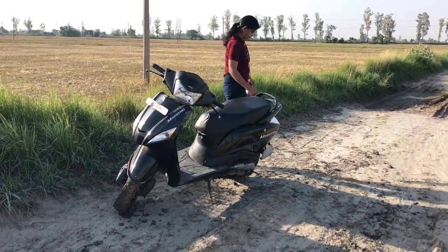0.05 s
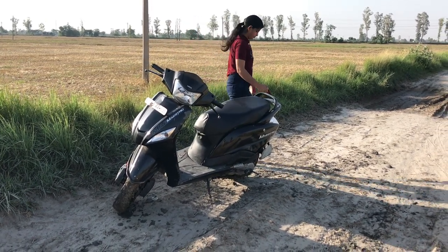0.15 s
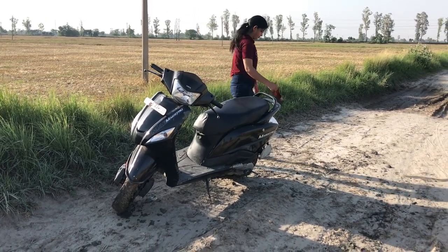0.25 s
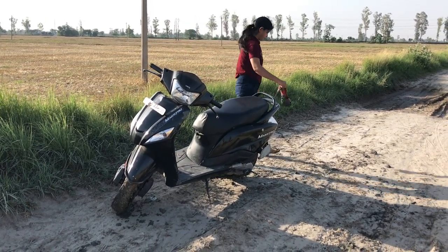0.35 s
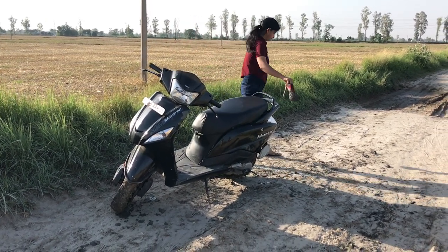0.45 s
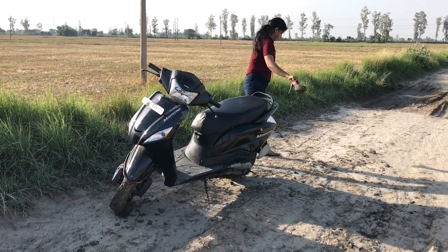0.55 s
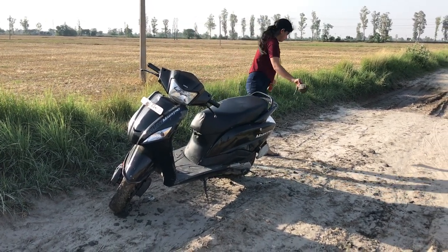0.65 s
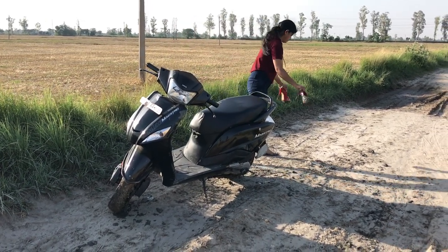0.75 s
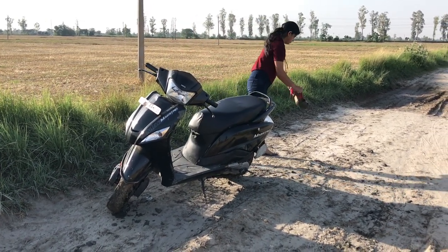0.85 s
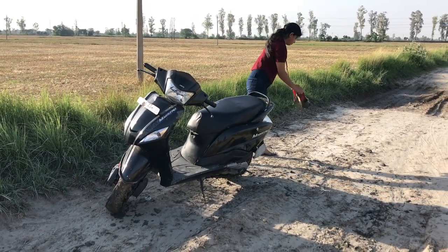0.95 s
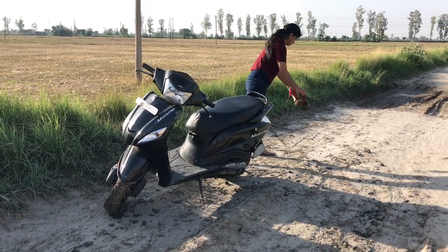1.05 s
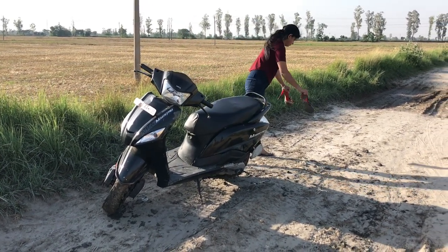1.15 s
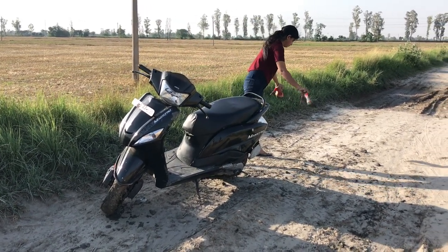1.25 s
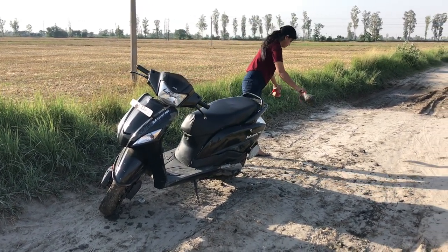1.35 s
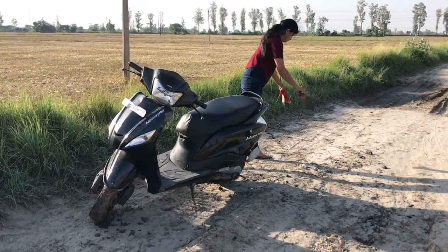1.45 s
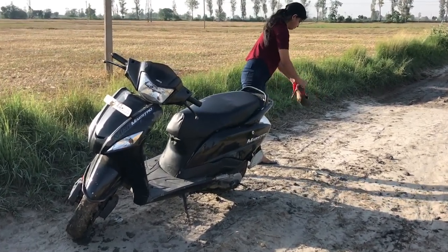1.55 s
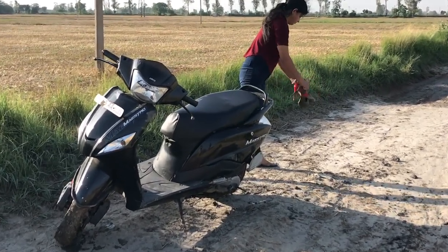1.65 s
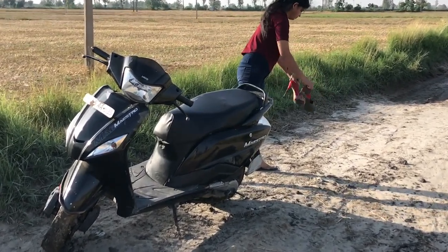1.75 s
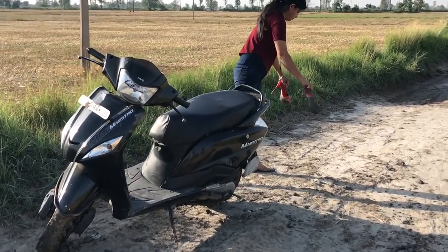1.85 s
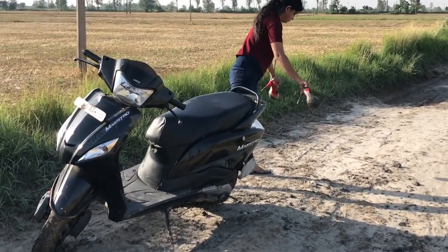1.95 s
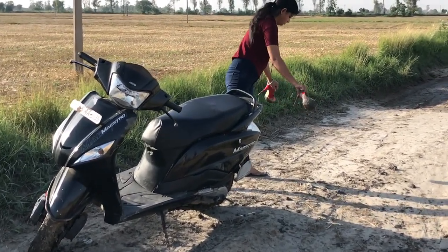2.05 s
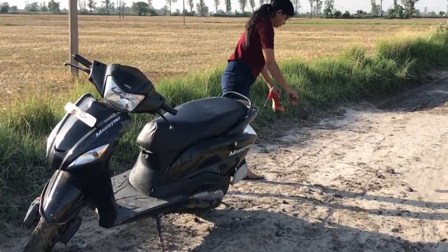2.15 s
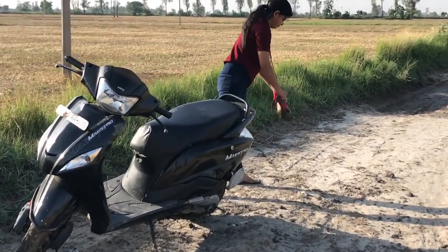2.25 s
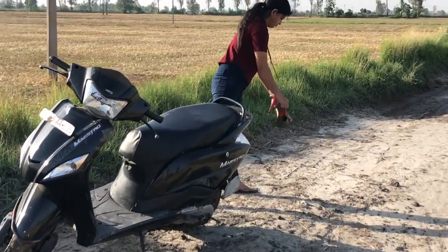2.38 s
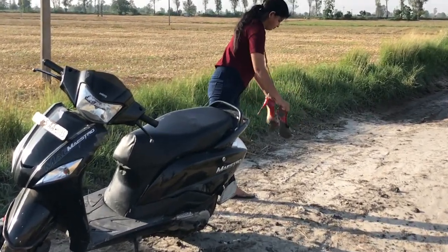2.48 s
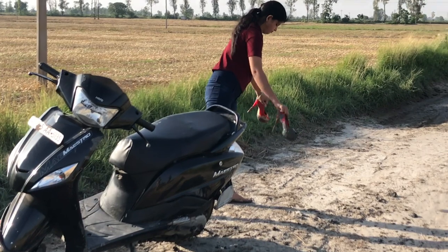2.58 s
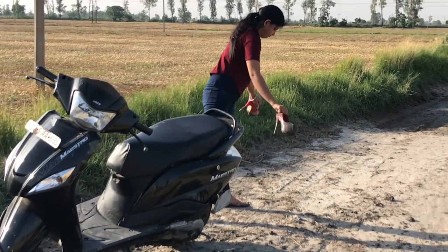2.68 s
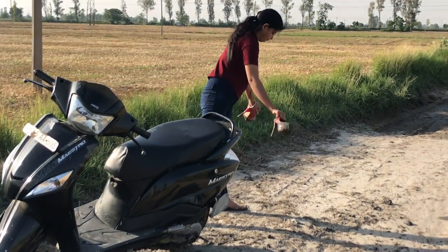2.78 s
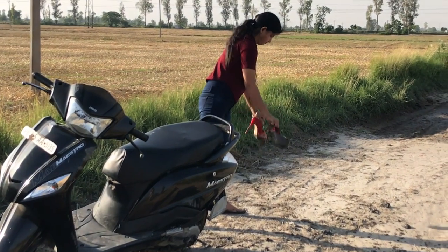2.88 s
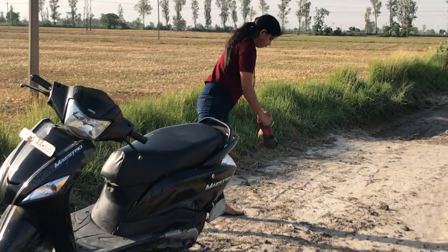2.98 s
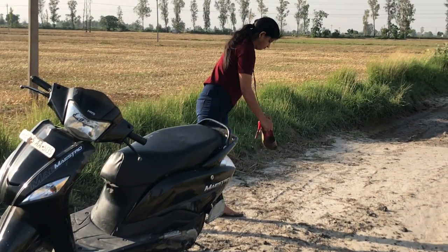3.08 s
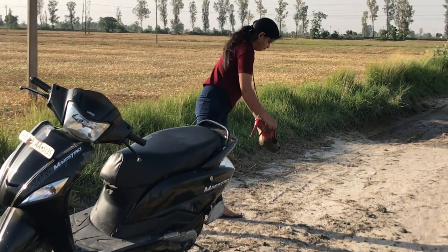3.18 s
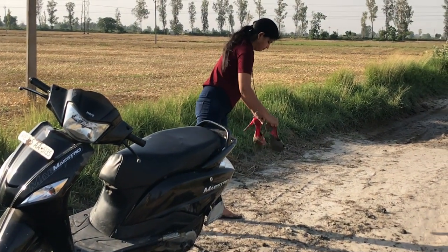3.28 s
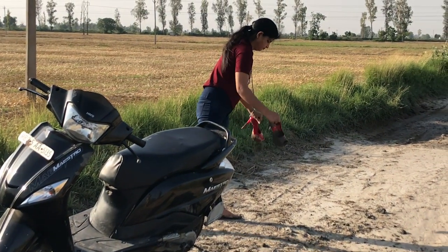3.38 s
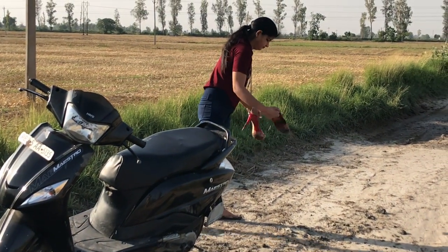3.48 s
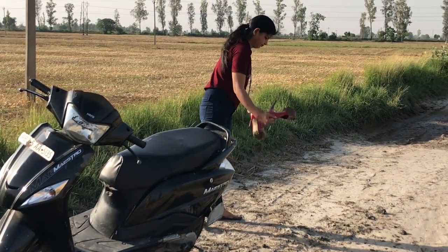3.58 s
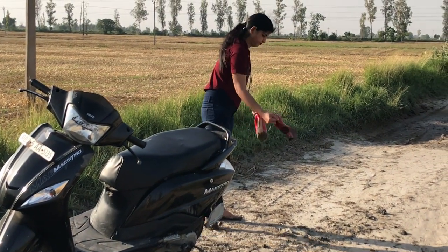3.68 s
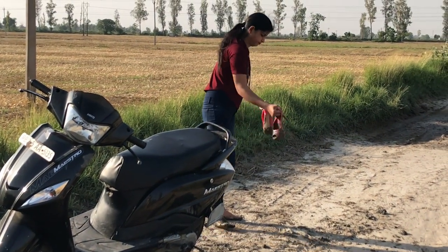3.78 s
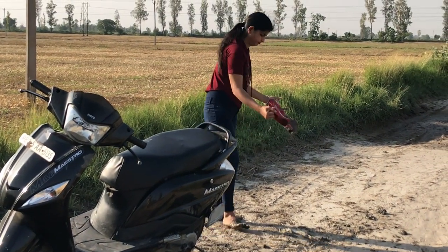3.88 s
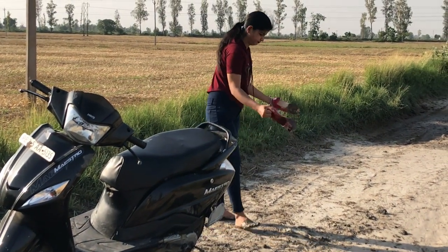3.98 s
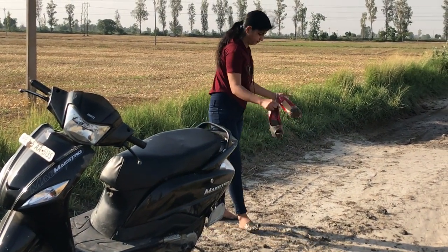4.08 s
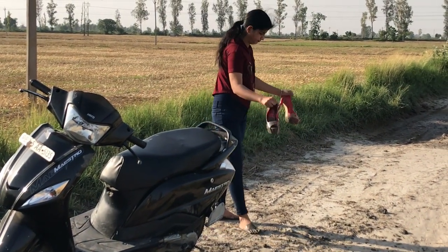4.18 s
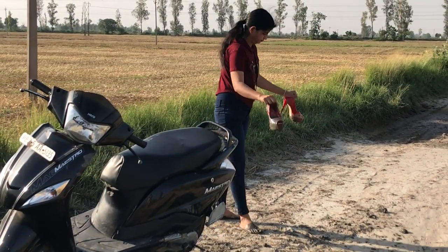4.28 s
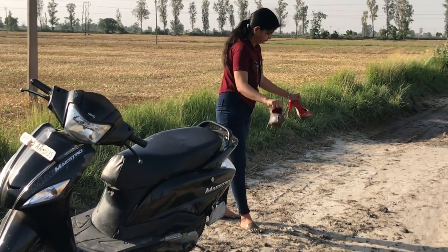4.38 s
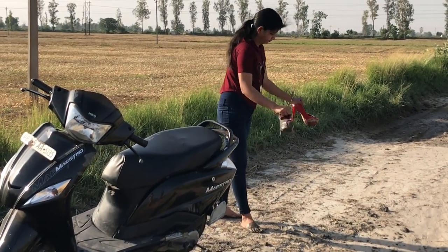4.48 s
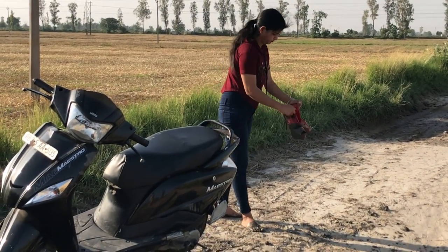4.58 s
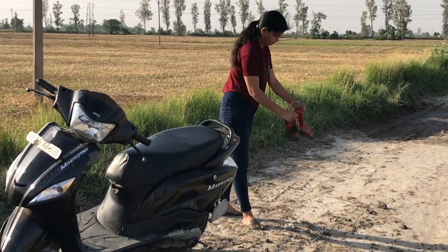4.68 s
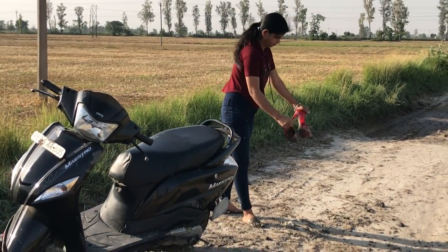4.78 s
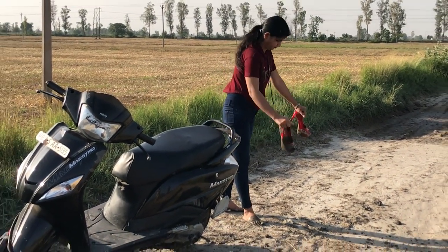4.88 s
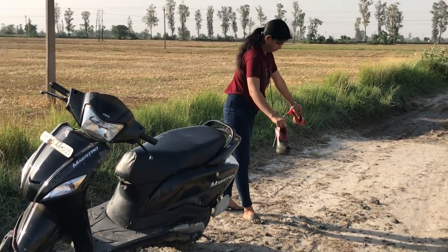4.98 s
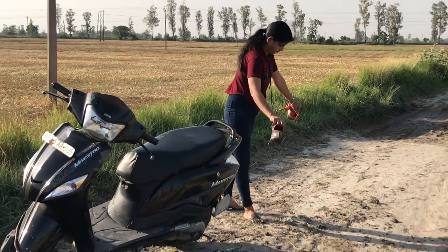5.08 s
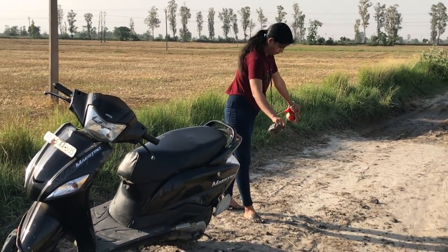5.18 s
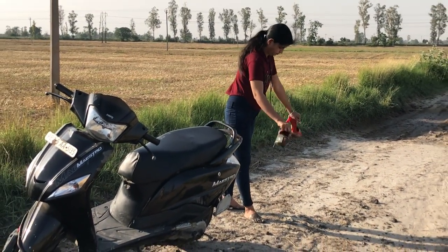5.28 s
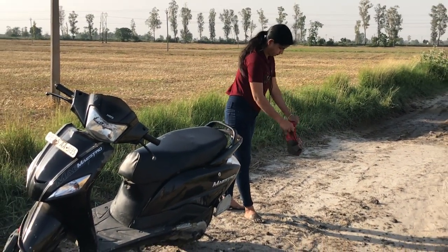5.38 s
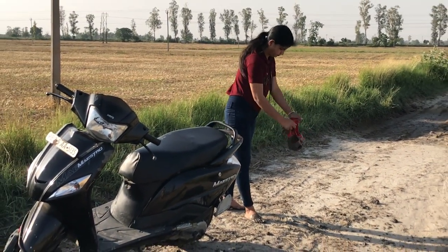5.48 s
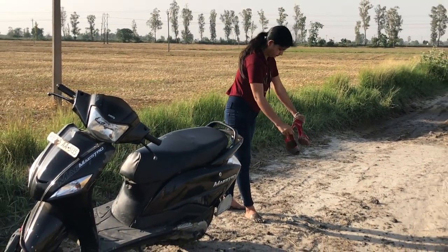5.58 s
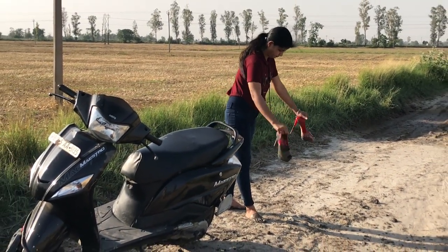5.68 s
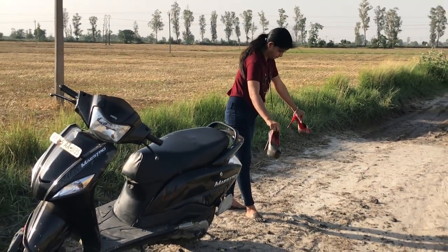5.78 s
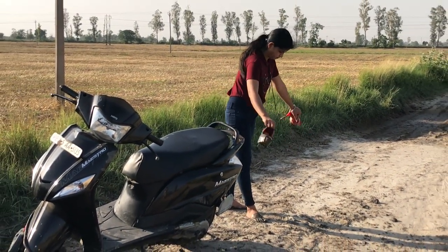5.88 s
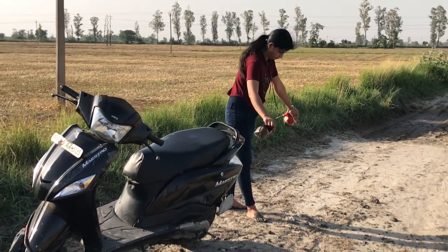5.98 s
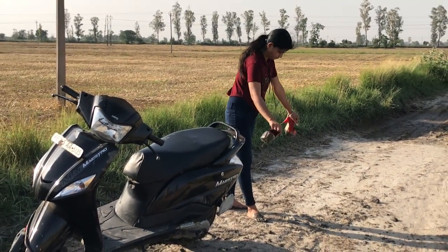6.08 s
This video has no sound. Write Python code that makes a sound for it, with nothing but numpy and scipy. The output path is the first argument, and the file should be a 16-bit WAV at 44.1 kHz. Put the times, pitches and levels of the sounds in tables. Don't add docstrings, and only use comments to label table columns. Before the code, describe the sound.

Six sharp, hollow claps of mud-caked sandals on a dirt track, shedding gritty crumbs, with low wind thumps, faint crickets and distant road hum.

```python
import sys
import numpy as np
from scipy import signal
from scipy.fft import rfft, irfft, next_fast_len
from scipy.io import wavfile

SR = 44100
rng = np.random.default_rng(int(sys.argv[2]) if len(sys.argv) > 2 else 0)


def linear_from_db(decibels):
    return 10 ** (np.asarray(decibels, float) / 20)


def persist_wave(psi):
    counts = np.round(np.clip(psi, -1, 1) * 32767).astype(np.int16)
    wavfile.write(sys.argv[1], SR, np.atleast_2d(counts).T)


N = 270798

# frequency in Hz, density in dB per Hz.
ROAD_SPECTRUM = [(250, -24), (330, -1), (480, -0.5), (640, 3.5), (780, -1), (1000, 2), (1400, -2.5),
                 (2000, -10), (3000, -17), (5000, -22)]
# time in seconds, level in dB.
ROAD_LEVEL = [(0, -52), (.31, -49.5), (2.44, -48.5), (4.46, -48), (5.04, -46.5), (5.61, -49.5), (6.14, -49)]
# time in seconds, level in dB.
WIND_LEVEL = [(0, -35), (.5, -37.5), (1.0, -36.5), (1.7, -39), (2.5, -37), (3.2, -37.5), (3.9, -36.5),
              (4.7, -39.5), (5.5, -37.5), (6.14, -39.5)]
# frequency in Hz, density in dB per Hz.
GUST_SPECTRUM = [(18, -31), (35, -2), (55, 19), (80, 8), (110, 11.5), (135, -9), (160, -48.5)]
# frequency in Hz, density in dB per Hz.
FLUTTER_SPECTRUM = [(100, -8), (140, 2), (180, -2.5), (230, -4), (290, -12.5), (400, -23.5), (600, -43)]
# centre in seconds, level in dB.
WIND_LUMPS = [(.02, -31), (.15, -34.5), (.26, -35), (.39, -30.5), (.48, -30), (.65, -49), (.95, -20),
              (1.02, -33), (1.2, -34), (1.49, -32), (1.57, -28.5), (2.5, -37), (2.72, -48), (2.82, -32),
              (3.01, -37), (3.13, -34.5), (3.86, -41), (4.07, -35), (4.238, -27.5), (4.56, -34),
              (4.62, -36), (4.7, -33), (4.96, -43), (5.37, -43), (5.59, -34.5), (6.02, -32)]
# start in seconds, peak in dB, first pitch in Hz, last pitch in Hz, turns in cycles.
BUFFETS = [(0.031, -25, 298, 150, 1.6), (0.084, -21, 222, 120, 1.44), (0.128, -19, 88, 59.4, 1.45),
           (0.323, -19, 129, 66.3, 1.7), (0.38, -27, 148, 90, 1.7), (0.432, -19, 185, 81, 1.5),
           (0.487, -24, 89.5, 60, 2), (0.634, -19, 83.6, 59, 1.3), (0.809, -24, 141, 90, 1.2),
           (0.8907, -7.5, 198, 181, 3.5), (0.8923, -18.5, 456, 294, 2.3), (0.899, -12.5, 86, 68, 2.34),
           (0.996, -16, 109, 63, 2.5), (1.166, -27.5, 255, 180, 1.1), (1.456, -24.5, 234, 111, 2),
           (1.556, -21, 129, 70, 1.5), (3.824, -24, 318, 147, 2.4), (4.225, -22, 119, 64.5, 1.2),
           (4.54, -28, 157, 109, 2.2)]
# start in seconds, end in seconds, level in dB,
# pitch at stroke start in Hz, lead on the common beat in strokes.
NEAR_TRILLS = [
    (-1, .2, -55, 8400, -.47),
    (1.2, 1.92, -59.5, 8400, -.5),
    (2.76, 3.985, -55.5, 8380, .79),
    (5.1, 6.3, -55.5, 8400, 2.3),
]
# start in seconds, end in seconds, level in dB,
# pitch at stroke start in Hz, lead on the common beat in strokes.
FAR_TRILLS = [
    (.02, .98, -59, 8550, -1.3),
    (1.9, 3.5, -61.5, 8750, 1.1),
    (4.5, 5.6, -64, 8650, .75),
]
# start in seconds, length in seconds, level in dB.
DUST_FALLS = [
    (1.657, 0.16, -57),
    (3.25, 0.044, -58),
    (4.697, 0.051, -48.5),
    (4.823, 0.095, -47.5),
    (5.14, .05, -67),
    (5.536, .14, -55),
    (5.71, 0.16, -59),
]
# time in seconds, peak in dB, dull part in dB against the bright part.
SHED_CRUMBS = [(.925, -35, -1), (.9667, -41, -20), (0.976, -25, -3.5), (1.646, -30, -9), (1.65, -32, -21),
               (1.6544, -37, -12), (1.6724, -34.5, -29), (2.3542, -25, -11), (2.364, -33.5, -9),
               (3.0885, -30, -5), (3.0954, -35, -29), (3.1115, -33, -25), (3.1393, -37.5, -36),
               (4.7044, -30.5, -13), (4.728, -38, -6), (5.5246, -37, -27), (5.528, -29, -7),
               (5.5472, -33, -3), (5.5967, -44, -26), (5.617, -40, -21), (5.6535, -44, -12)]
# time in seconds, peak in dB, dull part in dB against the bright part.
STRAY_CRUMBS = [(1.2231, -54, -3), (1.2487, -41.5, -23), (1.307, -35.5, -32), (1.3714, -46, 3),
                (2.209, -45, -12), (2.5726, -44, -18), (3.267, -37, -12), (3.3308, -52, -13),
                (3.658, -48.5, 6.5), (3.7338, -37, -7), (3.797, -42, -29), (4.12, -34.5, -29),
                (4.819, -29.5, -43), (4.905, -41, -21), (4.9214, -42, -17), (4.975, -44, -30),
                (5.1495, -41, -17), (5.2475, -41, -8), (5.7214, -41, -23), (5.7554, -44, -21)]
# time in seconds, pop of trapped air in dB, settled pitch in Hz, contact in ms,
# crack of the mud cake in dB.
CLAPS = [
    (0.9295, -0.5, 1067, 2.28, -6.5),
    (1.6088, -5.5, 950, 4.07, 1),
    (2.3133, 0.5, 897, 3.9, -4.5),
    (3.0399, 1, 860, 3.02, -3.5),
    (4.6538, 2, 820, 4.17, 1),
    (5.4795, 4.5, 794, 4.38, -2),
]
# thud in dB, slap in dB, stiff part in Hz,
# stiff part in dB, snap in dB.
GRIPS = [
    (-42, -15.5, 1950, -15, -8),
    (-17.5, -46, 1980, -8.5, -7),
    (-17, -30, 2030, -7.5, -9.5),
    (-11, -22, 2000, -20, -8),
    (-10.5, -37, 1640, -1, 0.5),
    (-12, 2.5, 1710, -2.2, -5),
]
# time in seconds, pop in dB, settled pitch in Hz,
# stiff part in Hz, crack in dB.
REBOUNDS = [(0.9324, -4, 785, 1400, -12), (0.9518, -16.5, 1150, 2700, -19), (0.9777, -22, 1000, 2670, -30),
            (1.228, -60, 1100, 2700, -38.5), (1.3067, -37, 960, 2600, -43.5),
            (1.6575, -35, 736, 1750, -34.5), (2.331, -17.5, 990, 1480, -15), (2.363, -32, 885, 1720, -37),
            (3.0558, -19, 776, 2600, -30.5), (3.1217, -22.5, 970, 2000, -40),
            (3.1262, -28, 1010, 1500, -47), (3.139, -37, 990, 1500, -48), (3.659, -36, 1220, 2240, -45),
            (4.1192, -42, 1190, 2500, -58), (4.659, -6.5, 730, 1500, -30),
            (4.6712, -10.5, 1300, 2400, -12.5), (4.7048, -28, 1040, 2140, -41),
            (4.816, -35, 1480, 1850, -35.5), (5.5037, -26, 1300, 2400, -32), (5.5293, -26, 990, 2300, -42),
            (5.56, -28, 1260, 2280, -29.5), (5.5877, -41, 950, 2200, -43)]
# frequency in Hz, level in dB, decay by 60 dB in seconds.
THUD_MODES = [(185, -6, 0.11), (404, 3, 0.043), (436, -12, 0.056)]
# frequency in Hz, decay by 60 dB in seconds.
SLAP_MODE = (610, 0.017)
# frequency in Hz, level in dB, decay by 60 dB in seconds.
CLACK_MODES = [(2920, 6.5, 0.0057), (3470, -15, 0.0025), (4150, 12.5, 0.0019), (5660, 0.5, 0.0029),
               (6450, 5, 0.0016)]
# frequency in Hz, gain in dB.
MIC_COLOUR = [(20, -2.5), (4000, 0), (6500, -2), (8500, 1.5), (10300, -3.5), (11600, 1.5), (12500, 4.5),
              (13400, -0.5), (14400, 3.5), (15700, -2.5)]
# frequency in Hz, gain in dB.
TOP_EDGE = [(20, 0), (15720, 0), (15800, -60)]


def rms_one(x):
    return x / np.sqrt(np.mean(x ** 2) + 1e-20)


def peak_one(x):
    return x / np.max(np.abs(x))


def level_curve(rows):
    s, db = np.transpose(rows)
    return np.interp(np.arange(N) / SR, s, db)


def colour(x, points):
    size = next_fast_len(N)
    hz, db = np.transpose(points)
    bins_hz = np.arange(size // 2 + 1) * SR / size
    gain = linear_from_db(np.interp(np.log(bins_hz + 1), np.log(hz), db))
    return irfft(rfft(x, size) * gain, size)[..., :N]


def butter(x, order, hz, kind):
    return signal.sosfilt(signal.butter(order, hz, kind, fs=SR, output="sos"), x)


def drift(rate_hz):
    r = np.exp(-2 * np.pi * rate_hz / SR)
    chance = rng.standard_normal(N + SR)
    return rms_one(signal.lfilter([1], [1, -2 * r, r * r], chance)[SR:])


def ring(x, hz, t60):
    r = linear_from_db(-60 / (t60 * SR))
    w = 2 * np.pi * hz / SR
    return signal.lfilter([0, np.sin(w)], [1, -2 * r * np.cos(w), r * r], x)


def ring_modes(x, modes):
    return peak_one(sum(linear_from_db(db) * ring(x, hz, t60) for hz, db, t60 in modes))


def add(out, s, piece):
    i = int(s * SR)
    out[i:i + len(piece)] += piece[:N - i]


def grains(count, per_s, spread_db):
    chance = rng.random((count, 3))
    sizes = linear_from_db(-spread_db * np.log(chance[:, 0] + 0.011)) * np.sign(chance[:, 1] - .5)
    return rms_one(sizes * (chance[:, 2] < per_s / SR) + 1e-9)


def grass():
    return linear_from_db(-61.5) * rng.standard_normal(N)


def road():
    breath_db = 1.34 * drift(27) + 0.45 * drift(56)
    noise = rms_one(colour(rng.standard_normal(N), ROAD_SPECTRUM))
    return linear_from_db(level_curve(ROAD_LEVEL) + breath_db) * noise


def wind():
    lump_s, upper_db, upper_follows = 0.019, -1.7, 0.083
    t = np.arange(N) / SR
    level_db = level_curve(WIND_LEVEL)
    lumps = sum(linear_from_db(db) * np.exp(-((t - s) / lump_s) ** 2) for s, db in WIND_LUMPS)
    unrest = drift(40)
    gust = rms_one(colour(rng.standard_normal(N), GUST_SPECTRUM) * linear_from_db(0.91 * unrest))
    flutter_db = 0.94 * unrest + 3.9 * drift(14.5)
    flutter = rms_one(colour(rng.standard_normal(N), FLUTTER_SPECTRUM) * linear_from_db(flutter_db))
    out = (linear_from_db(level_db) + lumps) * gust
    out += (linear_from_db(level_db + upper_db) + upper_follows * lumps) * flutter
    for s, peak_db, first_hz, last_hz, turns in BUFFETS:
        part = np.linspace(0, 1, int(2 * turns * SR / (first_hz + last_hz)))
        hz = first_hz + (last_hz - first_hz) * part
        swell = np.sqrt(np.sin(np.pi * part)) * (1 - part ** 4)
        add(out, s, -linear_from_db(peak_db) * swell * np.sin(2 * np.pi * np.cumsum(hz) / SR))
    return out


def trill(row, near, wobble):
    strokes_per_s, stroke_share, release_s = 53.5, .68, .02
    warm_s, cold_db, cold_pitch, cold_strokes = .56, -14, .1, 4.5
    far_start_db, far_gain_per_s = -7, 1.8
    start, end, db, pitch_hz, beat = row
    t = np.arange(N) / SR
    if near:
        cold = np.clip(1 - (t - start) / warm_s, 0, 1)
        ahead = beat + cold_strokes * cold ** 2
        level_db = db + 5.5 + cold_db * cold
        pitch_hz = pitch_hz * (1 - cold_pitch * cold)
    else:
        ahead = beat + far_gain_per_s * (t - start)
        level_db = db + 5.5 + far_start_db * (end - t) / (end - start)
    level = linear_from_db(level_db) * (t >= start) * np.clip((end - t) / release_s, 0, 1)
    stroke = np.minimum((strokes_per_s * t + ahead + .24) % 1 / stroke_share, 1)
    hz = pitch_hz * wobble * (1 - .17 * stroke ** 2.2)
    return level * np.sin(np.pi * stroke ** .75) * np.sin(2 * np.pi * np.cumsum(hz) / SR)


def crickets():
    wobble = 1 + .004 * drift(302)
    out = sum(trill(row, True, wobble) for row in NEAR_TRILLS)
    out = out + sum(trill(row, False, wobble) for row in FAR_TRILLS)
    echo = int(.0035 * SR)
    for lag in (echo, 2 * echo + 37):
        out[lag:] += .28 * out[:-lag].copy()
    return out * linear_from_db(0.33 * drift(40))


def dust():
    puff_db, puff_fall_db_per_s, sift_edge_s = -39.5, 330, .025
    t = np.arange(N) / SR
    puff = sum((t > s) * linear_from_db(db + puff_db - puff_fall_db_per_s * np.abs(t - s)) for s, db, *_ in CLAPS)
    sift = np.zeros(N)
    for s, length, db in DUST_FALLS:
        outside = np.maximum(np.abs(t - s - length / 2) - length / 2, 0)
        sift += linear_from_db(db) * np.exp(-(outside / sift_edge_s) ** 2)
    fine = grains(N, 4000, 4.5) * linear_from_db(3.5 * drift(70))
    coarse = butter(puff * fine, 2, 4500, "high")
    grit = linear_from_db(-9.5) * ring(sift * fine, 11640, 0.0018)
    return coarse + butter(sift * fine, 4, 10500, "high") + grit


def crumbs():
    spray_ms, spray_db = 4.8, -16
    out, t = np.zeros(N), np.arange(SR // 25) / SR
    for s, peak_db, dull_db in SHED_CRUMBS + STRAY_CRUMBS:
        spray = linear_from_db(spray_db) * grains(len(t), 9000, 3.0) * np.exp(-(t * 1000 / spray_ms) ** 2)
        spray[0] += 1
        bright = butter(spray, 2, 4500, "high")
        dull = butter(spray, 2, [1400, 4800], "band")
        add(out, s + 0.00065, linear_from_db(peak_db + 13.5) * (bright + linear_from_db(dull_db + 5) * dull))
    return out


def air_pop(t, pop_db, first_hz, last_hz, contact, fade):
    after = np.maximum(t - contact, 0)
    hz = last_hz + (first_hz - last_hz) * np.exp(-t / (0.46 * contact))
    onset = 1 - np.exp(-(t / 0.00066) ** 2)
    growth = 0.31 + 0.66 * np.minimum(t / (0.61 * contact), 1)
    decay = 0.89 * np.exp(-after / fade) + 0.042 * np.exp(-after / 0.013)
    return linear_from_db(pop_db) * onset * growth * decay * np.sin(2 * np.pi * np.cumsum(hz) / SR + 3.52)


def sole_thud(t, contact, thud_db, slap_db):
    shove = np.sin(np.pi * np.clip((t - .5 * contact) / 0.00062, 0, 1)) ** 2
    slap = peak_one(ring(shove, *SLAP_MODE))
    return linear_from_db(thud_db) * ring_modes(shove, THUD_MODES) + linear_from_db(slap_db) * slap


def mud_crack(t, contact, stiff_hz, stiff_db, clack_db, snap_db):
    after = np.maximum(t - contact, 0)
    strength = np.exp(-t / (0.16 * contact)) + 0.22 * np.exp(-after / .002) + 0.025 * np.exp(-t / 0.022)
    crackle = grains(len(t), 14000, 1.12) * strength
    stiff = peak_one(ring(crackle, stiff_hz, 0.006))
    snap = peak_one(butter(crackle, 1, [4500, 12000], "band"))
    return linear_from_db(stiff_db) * stiff + linear_from_db(clack_db) * ring_modes(crackle, CLACK_MODES) + linear_from_db(snap_db) * snap


def contacts():
    for (s, pop_db, hz, contact_ms, crack_db), grip in zip(CLAPS, GRIPS):
        thud_db, slap_db, stiff_hz, stiff_db, snap_db = grip
        air = (pop_db, 1.362 * hz, hz, contact_ms / 1000, 0.65 / 1000)
        yield s, air, (thud_db, slap_db), (stiff_hz, stiff_db, crack_db, snap_db)
    for s, pop_db, hz, stiff_hz, crack_db in REBOUNDS:
        air = (pop_db, 1.12 * hz, hz, 3.06 / 1000, 0.94 / 1000)
        yield s, air, (pop_db - 25, pop_db - 13.5), (stiff_hz, crack_db + 3.5, crack_db + 0.5, crack_db - 25)


def claps():
    out, t = np.zeros(N), np.arange(SR // 12) / SR
    for s, air, thud, crack in contacts():
        contact = air[3]
        sound = air_pop(t, *air) + sole_thud(t, contact, *thud) + mud_crack(t, contact, *crack)
        add(out, s + .0004, sound)
    return out


def scene():
    return (grass() + road() + wind() + crickets() + dust() + crumbs() + claps())[None]


def low_pass(x):
    return signal.sosfilt(signal.butter(12, 16530, fs=SR, output="sos"), x)


def record(dry):
    heard = butter(dry, 2, 27.8, "high")
    heard = colour(colour(heard, MIC_COLOUR), TOP_EDGE)
    return low_pass(np.clip(heard, -1, 1))


dry = scene()
out = record(dry)
persist_wave(out)
```